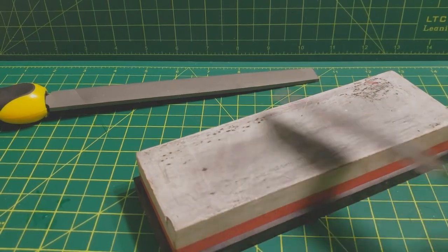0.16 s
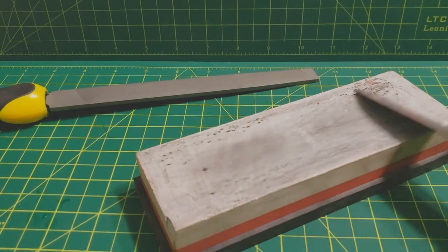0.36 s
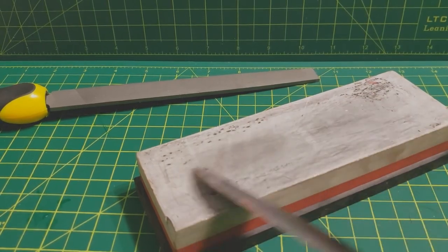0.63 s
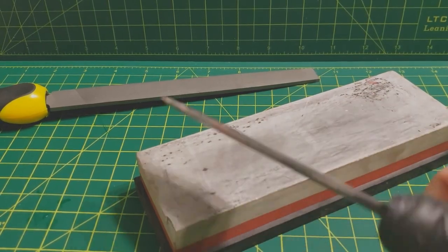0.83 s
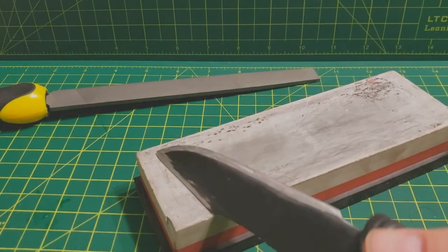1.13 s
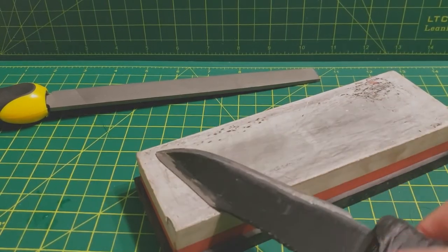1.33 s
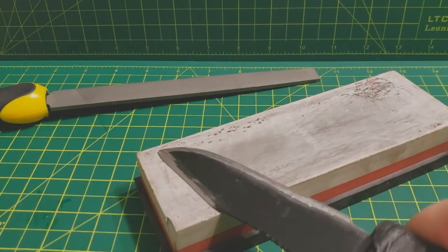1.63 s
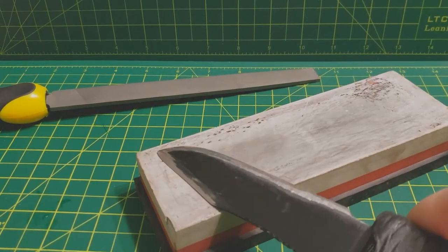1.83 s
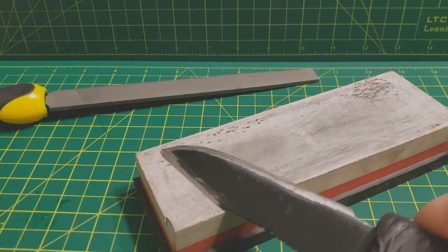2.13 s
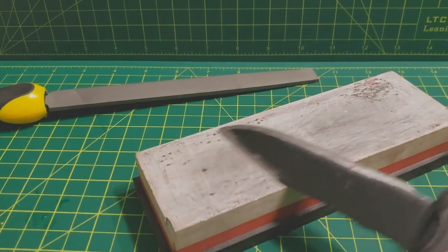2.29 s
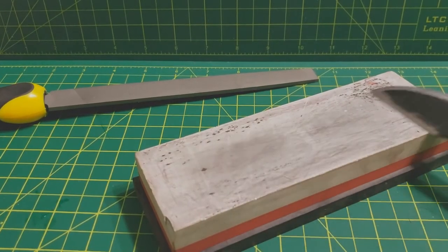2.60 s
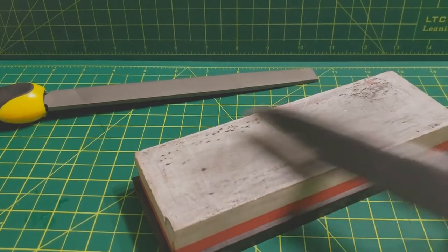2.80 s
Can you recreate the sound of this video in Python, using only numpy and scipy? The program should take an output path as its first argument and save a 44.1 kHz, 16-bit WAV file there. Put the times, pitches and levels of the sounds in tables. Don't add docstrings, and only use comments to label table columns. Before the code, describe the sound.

Knife sharpening on a whetstone: a crisp hissing push, clacking set-downs, then a longer pull

```python
import sys
import numpy as np
from scipy import signal
from scipy.fft import rfft, irfft
from scipy.io import wavfile
from scipy.ndimage import uniform_filter1d, map_coordinates

SR = 44100
rng = np.random.default_rng(int(sys.argv[2]) if len(sys.argv) > 2 else 0)


def store_pcm(level_fs):
    pcm = np.round(np.clip(level_fs, -1, 1) * 32767).astype(np.int16)
    wavfile.write(sys.argv[1], SR, np.atleast_2d(pcm).T)


def decibels_to_gain(level_db):
    exponent = np.asarray(level_db, float) / 20
    return 10 ** exponent


N = 130095
HALF_LR = np.array([[.5], [-.5]])

# f/Hz, density/dB per Hz
RUMBLE_SPECTRUM = [(30, -29), (77, -2), (105, -15.5), (148, -10.5), (180, -20), (240, -21), (350, -33.5),
                   (800, -63)]
AIR_SPECTRUM = [(300, -32.5), (500, -8.5), (1600, -14), (6300, -20.5), (8500, -25.5), (11500, -15.5),
                (15700, -14)]
RUMBLE_DB, AIR_DB = -50.5, -72
# f/Hz, correlation/1
LIKENESS = [(60, 0.96), (1200, 0.72), (2500, 0.17), (14000, 0.26)]

# t/s, pressure/dB, stone body/dB, table body/dB, left-right/dB
LIFT = [
    (0, -36, -11.5, -45, 1),
    (.03, -44.5, 2.5, 1, -0.5),
    (.048, -62.5, 10, 9, 1.5),
    (.072, -47, 0.5, -9, 2),
    (.09, -58.5, -5, 10, -2),
    (.17, -81.5, -10, 11, 15.5),
]
PUSH = [
    (.357, -34, 7, -26, 0.57),
    (.38, -34, -12.5, -21.5, -0.29),
    (.5, -30.5, -9.5, -22, -0.42),
    (.6, -30.5, -8, -32.5, -0.52),
    (.685, -32.5, -8, -32, -0.56),
    (.705, -48, -9, -10.5, -1.4),
    (.79, -72, -8, -23, -1.7),
]
TURN = [
    (.82, -65.5, -12, -40.5, 0.64),
    (.87, -64.5, -11.5, -28, .5),
    (.9, -53, -17.5, -30, -1),
    (.95, -53.5, -29, -25.5, -3.5),
    (.98, -63, -24, -30.5, 0.7),
    (1.13, -68, -26.5, -23.5, -1),
]
SETTLE = [
    (1.16, -47, -29, 5, .5),
    (1.3, -67, -12, -28.5, 0.6),
    (1.48, -70.5, -25, -14.5, .5),
]
CREEP = [
    (1.645, -63, -23.5, 8, 1.3),
    (1.78, -64.5, -12.5, -14, 5),
    (1.83, -57.5, -23, -15.5, 5.3),
    (1.89, -62.5, -13.5, -16, 7),
    (1.97, -54.5, -21, -17, 5.5),
    (2.06, -60, -16.5, -20.5, 4.4),
    (2.13, -61.5, -8, -15, 4.5),
]
PULL = [
    (2.1, -66.5, -18, -3, 11),
    (2.14, -44, -15.5, -22, -1),
    (2.2, -35.5, -14.5, -18.5, 0.76),
    (2.415, -34.5, -12, -15, -3),
    (2.445, -33.5, -16, -29, -1.5),
    (2.52, -33, -13.5, -37, -4),
    (2.61, -33.5, -13, -34.5, -3.5),
    (2.655, -44, -8.5, -27, -4),
    (2.7, -81, -7, -42.5, 1),
]
# f/Hz, density/dB per Hz
PUSH_HISS = [(1500, -39.5), (2200, -14.5), (4000, -6.5), (6700, -1.5), (8000, -3.5), (11600, -1.5),
             (13500, -16), (15700, -3.5)]
TURN_HISS = [(1500, -20.5), (2200, -8.5), (2600, -10.5), (3430, -10), (11200, -4), (15700, -5.5)]
CREEP_HISS = [(2000, -18), (3700, -11.5), (4650, 3), (5350, -8.5), (6300, -4), (8130, -5.5), (9050, -25),
              (15700, -21)]
PULL_HISS = [(1500, -42), (2800, 0.5), (4200, 6), (5800, 3.5), (6800, 1), (10400, 0), (13500, -8.5),
             (15700, -5)]
# f/Hz, width/Hz, push level/dB, pull level/dB
BLADE_MODES = [(3483, 110, -7, -9), (3750, 810, -21, -9.5), (4926, 430, 0.5, -4.5), (6850, 560, -1.5, 2.5),
               (8800, 290, -14.5, 1.5), (11790, 500, -2.5, -1.5), (12700, 400, -2, -4),
               (14800, 1300, 9.5, -4), (15100, 260, -30, -1.5)]
# f/Hz, width/Hz, level/dB
CREEP_MODES = [(4770, 190, -5), (6180, 82, 20), (11800, 190, -6)]
STONE_MODES = [(859, 130, 2), (1107, 150, 1.5), (1655, 685, 9), (2360, 2100, 5.5)]
TABLE_MODES = [(270, 287, 3.5), (465, 450, 2), (659, 394, 0.5)]
# t/s, half length/s, start f/Hz, end f/Hz, level/dB
SWELLS = [(0.0383, 0.019, 720, 620, -50), (0.069, 0.026, 617, 720, -52.5), (0.104, 0.0245, 740, 760, -55.5),
          (.07, .018, 8700, 8700, -57), (.07, 0.017, 18000, 25000, -48), (0.41, 0.065, 14400, 14600, -46),
          (0.412, 0.067, 11700, 12500, -40.5), (0.516, .07, 11400, 11500, -37.5),
          (.52, 0.07, 12400, 12700, -42), (0.45, 0.046, 8900, 8900, -41), (0.557, .05, 9040, 9300, -40.5),
          (0.61, .05, 9600, 10100, -40.5), (.66, .05, 18000, 18000, -43), (0.635, .07, 6600, 6270, -44.5),
          (0.64, .061, 4750, 4890, -44), (0.626, 0.072, 3790, 3590, -44), (.63, 0.049, 1600, 1650, -52),
          (1.685, .05, 3950, 5050, -65), (1.83, 0.029, 6150, 6150, -62), (1.99, 0.068, 6150, 6200, -60),
          (2.28, 0.16, 4900, 4850, -45), (2.43, 0.15, 6400, 7000, -44), (2.18, 0.048, 12800, 11000, -52.5),
          (2.2, 0.048, 9900, 10000, -50.5), (2.3, .04, 15400, 15700, -51.5), (2.4, 0.06, 9000, 9100, -54),
          (2.8, 0.083, 9120, 8880, -44.5), (2.53, 0.095, 10900, 11800, -42),
          (2.42, 0.041, 12500, 12450, -47), (2.5, .05, 16000, 14500, -47),
          (2.6, 0.067, 15200, 15100, -47.5), (2.54, .1, 4130, 3950, -46.5),
          (2.32, 0.045, 1260, 1185, -47.5), (2.47, 0.039, 897, 840, -50.5), (2.593, 0.095, 830, 810, -61.5)]
SWELL_HZ, SWELL_Q = 60, 16
GRAINS_PER_S, GRAIN_SPREAD_DB, CHATTER_DB = 9000, 2.5, 1
BLADE_DB, CREEP_RING_DB = 0.5, 1
RING_DB_PER_DB = 1.2
BLADE_DRIFT_DB, BODY_DRIFT_DB, DRIFT_S = -0.5, 2.5, 0.033
LAG_S, LAG_S_PER_DB = .00007, -.00005
ECHO_DB, ECHO_S, ECHO_DRIFT_S = -6, .0005, .00004

# t/s, blow/dB, crack/dB, brightness/Hz
TAPS = [
    (0.349, -15.5, -19.5, 15100),
    (1.1406, -13, -14, 9000),
    (1.1554, -20, -30, 4450),
    (1.6354, -32.5, -31, 8300),
]
# f/Hz, level/dB, t60/s
TAP_MODES = [
    [(953, 0, 0.021), (1780, -7, 0.015), (3880, -20, 0.018), (5270, -0.5, 0.0097), (7170, -7.5, .017),
     (11900, -2.5, .008), (14800, -13.5, .007)],
    [(1071, 0.5, .014), (1448, -0.5, .012), (1750, -5.5, .012), (2610, -15, 0.024), (4520, -9, 0.017),
     (6390, -9, 0.012), (8640, -12, .011)],
    [(650, -4, 0.022), (1150, -4, 0.016), (1840, -3, 0.017), (3430, -1, 0.017), (4470, -8.5, 0.01),
     (5410, 1, .015), (7190, -7, .008)],
]
CRACK_S, CRACK_PAN_DB = 0.017, 4.5
# t/s, f/Hz, level/dB, t60/s
THUMPS = [
    (.35, 150, -27.5, 0.32),
    (.35, 248, -36, 0.17),
    (1.144, 73.2, -34.5, 0.38),
    (1.142, 222, -37, 0.19),
    (1.637, 212, -39, 0.13),
]
# t/s, level/dB, low f/Hz, high f/Hz, t60/s
TICKS = [
    (1.1666, -46, 901, 7001, .021),
    (1.3121, -53, 11701, 15501, 0.045),
    (1.3791, -50.5, 331, 1250, 0.042),
    (1.4071, -53.5, 323, 1300, 0.047),
    (1.7321, -42.5, 4241, 8000, 0.0111),
]

# f/Hz, t60/s
ROOM_T60 = [(150, 0.48), (4000, 0.28), (15000, 0.2)]
ROOM_STROKE_DB, ROOM_TAP_DB = -18, -13.5
# f/Hz, left-right/dB
MIC_COLOUR = [(500, 0), (2800, -1), (5500, 4), (10000, -3)]
MIC_EDGE_HZ = 15750


def evened(x):
    return x / np.sqrt(np.mean(x ** 2) + 1e-20)


def read(points, hz):
    f, value = np.transpose(points)
    return np.interp(np.log(hz + 1), np.log(f + 1), value)


def add(mix, start_s, sound):
    part = mix[:, round(start_s * SR):][:, :sound.shape[1]]
    part += sound[:, :part.shape[1]]


def coloured(x, points):
    count = x.shape[-1]
    gain = decibels_to_gain(read(points, np.fft.rfftfreq(count, 1 / SR)))
    return irfft(rfft(x) * gain, count)


def paired(a, b):
    same = np.clip(read(LIKENESS, np.fft.rfftfreq(len(a), 1 / SR)), -1, 1)
    right = same * rfft(a) + np.sqrt(1 - same ** 2) * rfft(b)
    return np.array([a, irfft(right, len(a))])


def paired_noise(count):
    return paired(*rng.standard_normal((2, count)))


def wander(count, seconds):
    size = max(int(seconds * SR), 2)
    smooth = uniform_filter1d(rng.standard_normal(count), size)
    return evened(uniform_filter1d(smooth, size))


def late(x, lag_s):
    at = np.arange(len(x)) - lag_s * SR
    return map_coordinates(x, at[None], order=5)


def delayed(x, lag_s):
    return np.array([late(x[0], lag_s), x[1]])


def floor():
    count = N + N % 2
    rumble = evened(coloured(paired_noise(count), RUMBLE_SPECTRUM))
    rumble = rumble * decibels_to_gain(RUMBLE_DB + 1.5 * wander(count, 0.016))
    air = evened(coloured(paired_noise(count), AIR_SPECTRUM)) * decibels_to_gain(AIR_DB)
    return (rumble * decibels_to_gain(1.6 * HALF_LR) + air)[:, :N]


def grit_clicks(count):
    hit, size, sign = rng.random((2, SR, 3))[:, :count].T
    size_gain = decibels_to_gain(-GRAIN_SPREAD_DB * np.log(size + 0.067))
    grains = (hit < GRAINS_PER_S / SR) * np.sign(sign - .5) * size_gain
    return paired(*(grains.T * decibels_to_gain(CHATTER_DB * wander(count, 0.0027))))


def body(x, modes, drift_db, passes):
    out = 0
    for hz, width_hz, db in modes:
        section = np.concatenate(signal.iirpeak(hz, hz / max(width_hz, 20), SR))
        ring = evened(signal.sosfilt(np.array([section] * passes), x))
        out = out + decibels_to_gain(db + drift_db * wander(x.shape[1], DRIFT_S)) * ring
    return evened(out)


def notched(x):
    out = []
    for channel, stretch in zip(x, (1, 1.3)):
        lag_s = ECHO_S * stretch + ECHO_DRIFT_S * wander(len(channel), 0.089)
        out.append(channel + decibels_to_gain(ECHO_DB) * late(channel, lag_s))
    return np.array(out)


def swells(grit, t):
    out = np.zeros_like(grit)
    for mid_s, half_s, from_hz, to_hz, db in SWELLS:
        if t[0] < mid_s < t[-1]:
            u = np.clip((t - mid_s) / half_s, -1, 1)
            hz = from_hz + (to_hz - from_hz) * (u + 1) / 2
            turn = np.exp(2j * np.pi * np.cumsum(hz) / SR)
            r = np.exp(-np.pi * (SWELL_HZ + to_hz / SWELL_Q) / SR)
            ring = (turn * signal.lfilter([1], [1, -2 * r, r * r], grit / turn)).real
            out += decibels_to_gain(db) * np.cos(np.pi * u / 2) * evened(ring)
    return out


def stroke(curve, hiss, ring_modes, ring_db):
    s, db, stone_db, table_db, pan_db = np.transpose(curve)
    t = np.arange(2 * int((s[-1] - s[0]) * SR / 2)) / SR + s[0]
    pan_db = np.interp(t, s, pan_db)
    pan = decibels_to_gain(pan_db * HALF_LR)
    lag_s = np.clip(LAG_S + LAG_S_PER_DB * pan_db, 0, 1)
    grit = delayed(grit_clicks(len(t)), lag_s)

    ring = body(grit, ring_modes, BLADE_DRIFT_DB, passes=1)
    ring = coloured(ring, [(1500, -30), (3000, 0), (16000, 0)])
    firm_db = RING_DB_PER_DB * np.interp(t, s, db - db.max())
    hiss = evened(coloured(notched(grit), hiss))
    edge = evened(hiss + decibels_to_gain(ring_db + firm_db) * ring)

    low = decibels_to_gain(np.interp(t, s, stone_db)) * body(grit, STONE_MODES, BODY_DRIFT_DB, passes=2)
    low += decibels_to_gain(np.interp(t, s, table_db)) * body(grit, TABLE_MODES, BODY_DRIFT_DB, passes=2)

    fade_in = (t - s[0] + (s[0] < .01)) / 0.004
    ends = np.clip(np.minimum(fade_in, (t[-1] - t) / 0.0082), 0, 1)
    sound = (edge * pan + low) * decibels_to_gain(np.interp(t, s, db))
    return s[0], (sound + swells(grit, t) * pan) * ends


def tap(start_s, blow_db, crack_db, bright_hz, modes):
    t = np.arange(int(.2 * SR)) / SR

    def ring(detune):
        return sum(decibels_to_gain(db - 60 * t / t60) * np.sin(2 * np.pi * hz * detune * t) for hz, db, t60 in modes)

    crack = paired_noise(len(t)) * decibels_to_gain(crack_db - 60 * t / CRACK_S + 2 * CRACK_PAN_DB * HALF_LR)
    blow = crack + decibels_to_gain(blow_db) * np.array([ring(0.99), ring(1.02)])
    blow = np.minimum(t / 0.00039, 1) * blow
    lowpass = signal.butter(2, min(bright_hz, 20000), fs=SR)
    return start_s, delayed(signal.lfilter(*lowpass, blow), .0001)


def thump(start_s, hz, db, t60):
    t = np.arange(SR // 2) / SR
    envelope = decibels_to_gain(db - 60 * t / t60 + HALF_LR) * np.minimum(t / 0.0042, 1)
    return start_s, envelope * np.sin(2 * np.pi * hz * t)


def tick(start_s, db, low_hz, high_hz, t60):
    t = np.arange(4410) / SR
    burst = paired_noise(len(t)) * decibels_to_gain(-60 * t / t60) * np.minimum(t / (0.082 * t60), 1)
    band = signal.butter(2, [low_hz, high_hz], "bandpass", fs=SR, output="sos")
    same_power = np.sqrt(SR / 2 / (high_hz - low_hz))
    return start_s, decibels_to_gain(db) * signal.sosfilt(band, burst) * same_power


def room(x):
    echoes = np.zeros((2, SR // 2))
    slots = np.arange(200, SR // 2 - 20, 20)
    at = slots + rng.integers(0, 20, (2, len(slots)))
    np.put_along_axis(echoes, at, rng.choice([-1., 1.], at.shape), 1)
    hz, t, z = signal.stft(echoes, SR, nperseg=256)
    decay = decibels_to_gain(-60 * t / read(ROOM_T60, hz)[:, None])
    tail = signal.istft(z * decay, SR, nperseg=256)[1]
    return signal.fftconvolve(x, tail / np.linalg.norm(tail[0]), axes=1)[:, :N]


def scene():
    rub, taps, table = np.zeros((3, 2, N))
    push = [(hz, width_hz, push_db) for hz, width_hz, push_db, _ in BLADE_MODES]
    pull = [(hz, width_hz, pull_db) for hz, width_hz, _, pull_db in BLADE_MODES]
    strokes = [(LIFT, PUSH_HISS, push[4:], BLADE_DB - 3),
               (PUSH, PUSH_HISS, push, BLADE_DB),
               (TURN, TURN_HISS, pull, BLADE_DB - 15.5),
               (SETTLE, TURN_HISS, push, BLADE_DB - 24.5),
               (CREEP, CREEP_HISS, CREEP_MODES, CREEP_RING_DB),
               (PULL, PULL_HISS, pull, BLADE_DB)]
    for row in strokes:
        add(rub, *stroke(*row))
    for row, landing in zip(TAPS, (0, 1, 1, 2)):
        add(taps, *tap(*row, TAP_MODES[landing]))
    for row in TICKS:
        add(taps, *tick(*row))
    for row in THUMPS:
        add(table, *thump(*row))
    reflected = room(decibels_to_gain(ROOM_STROKE_DB) * rub + decibels_to_gain(ROOM_TAP_DB) * taps)
    return rub + taps + table + reflected + floor()


def top_cut(x):
    return signal.sosfilt(signal.butter(12, 16940, fs=SR, output="sos"), x)


def record(dry):
    even = np.pad(dry, ((0, 0), (0, N % 2)))
    left, right = [coloured(channel, [(hz, side * db) for hz, db in MIC_COLOUR])
                   for channel, side in zip(even, (.5, -.5))]
    mics = np.array([left, right])[:, :N]
    lowpass = signal.firwin(511, MIC_EDGE_HZ, window=("kaiser", 9), fs=SR)
    mix = signal.oaconvolve(mics, lowpass[None], "same")
    return top_cut(mix)


dry = scene()
out = record(dry)
store_pcm(out)
```